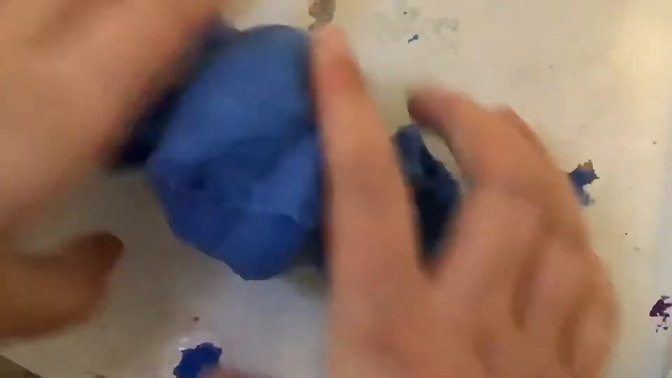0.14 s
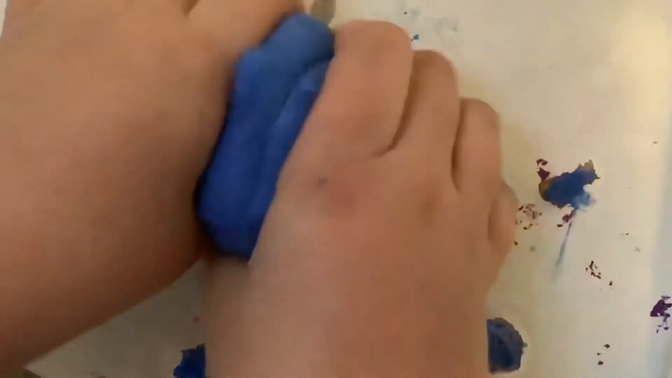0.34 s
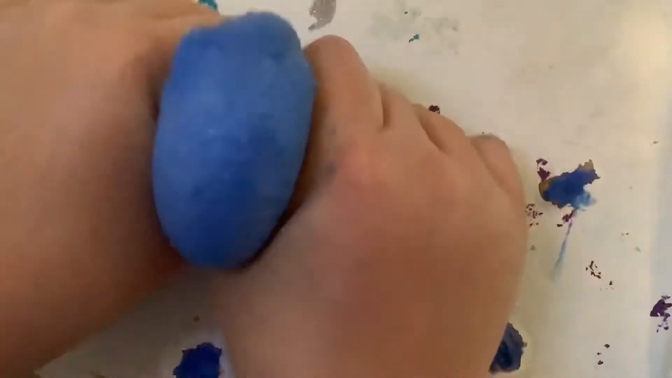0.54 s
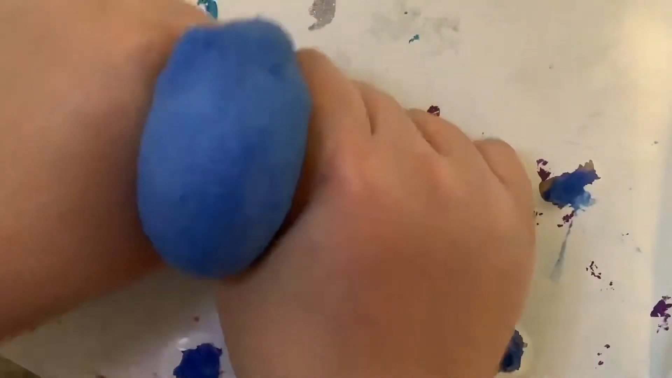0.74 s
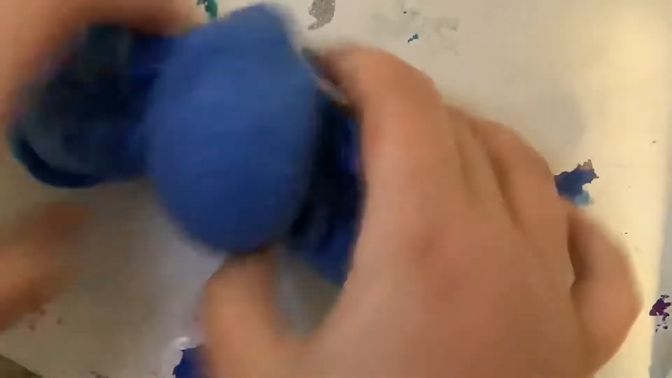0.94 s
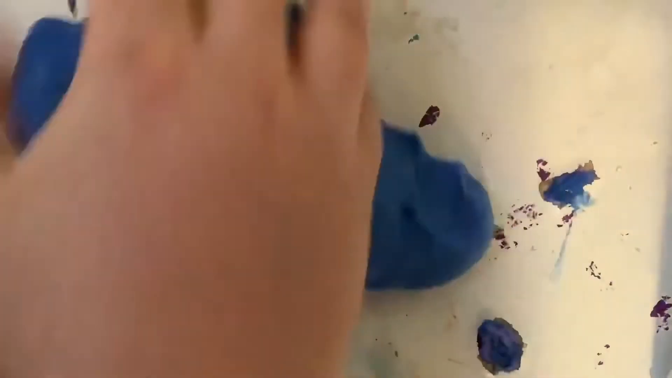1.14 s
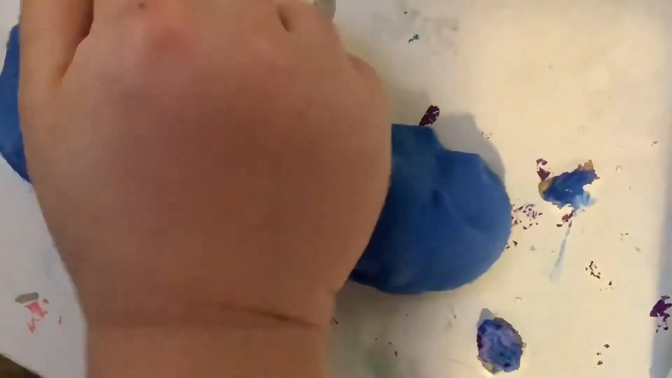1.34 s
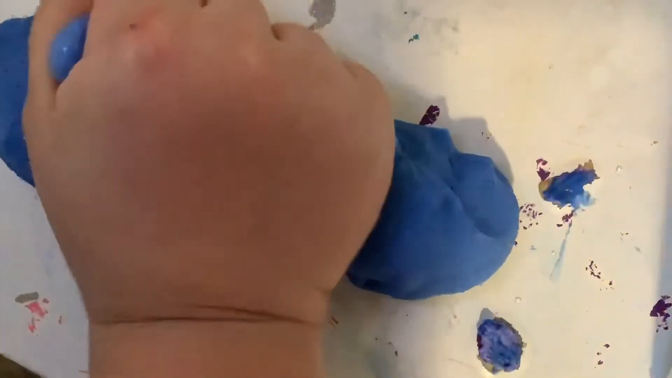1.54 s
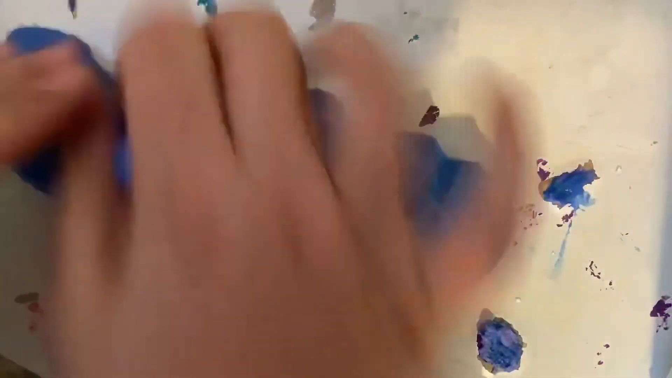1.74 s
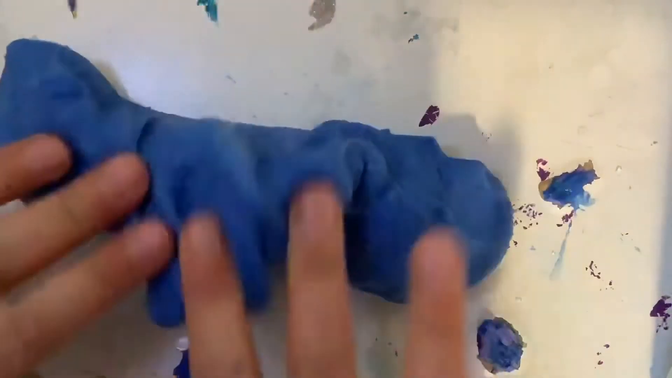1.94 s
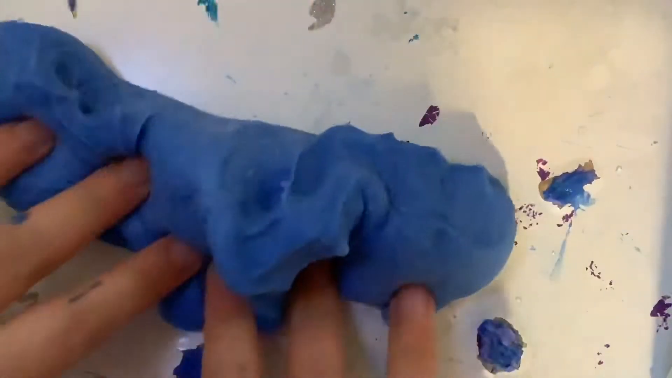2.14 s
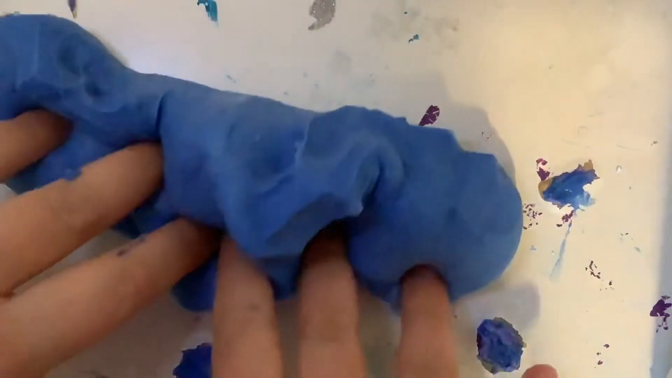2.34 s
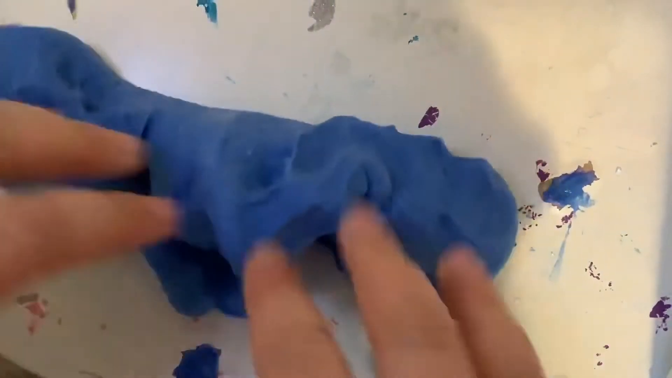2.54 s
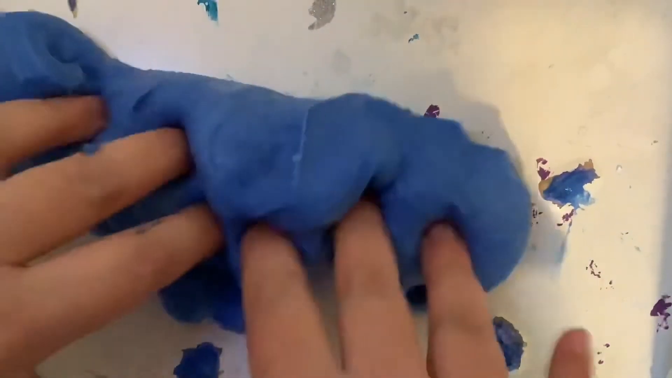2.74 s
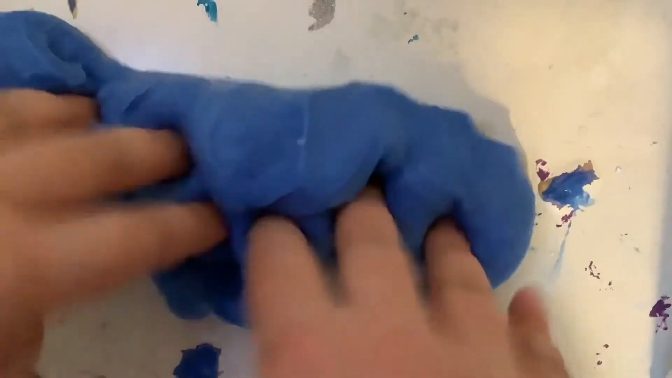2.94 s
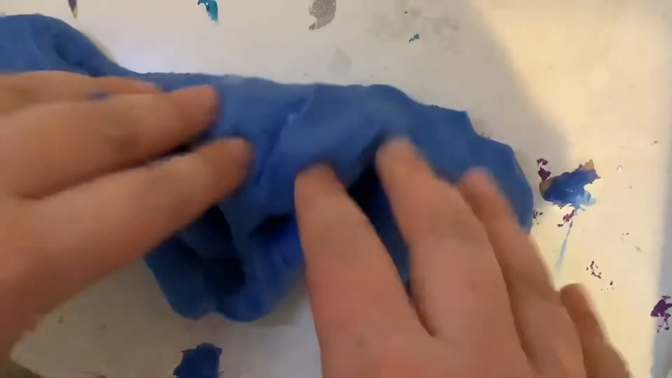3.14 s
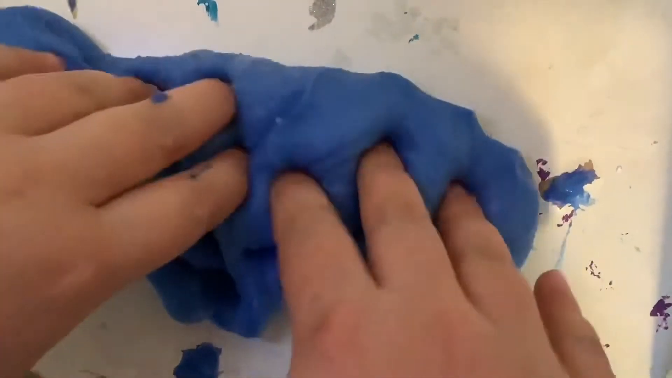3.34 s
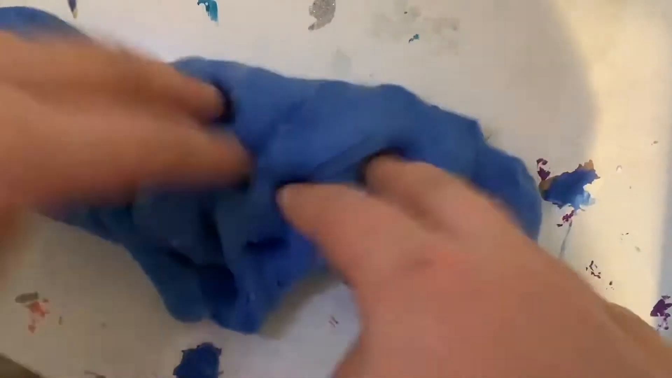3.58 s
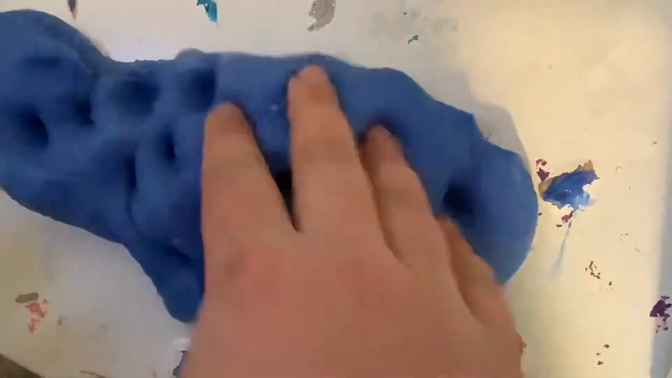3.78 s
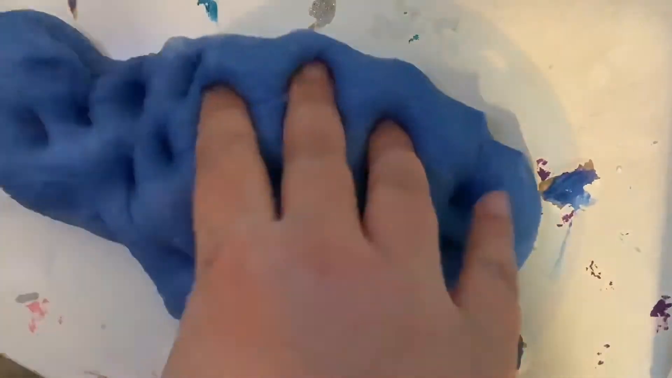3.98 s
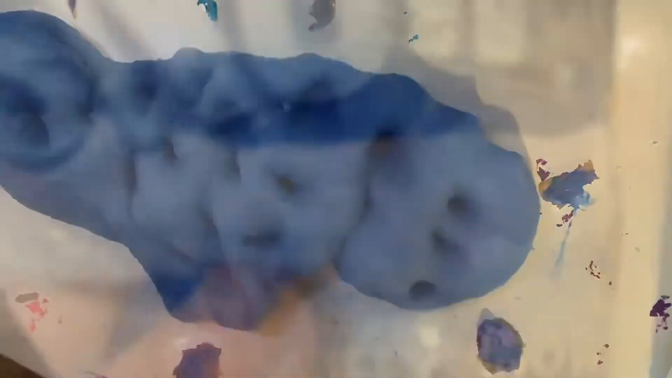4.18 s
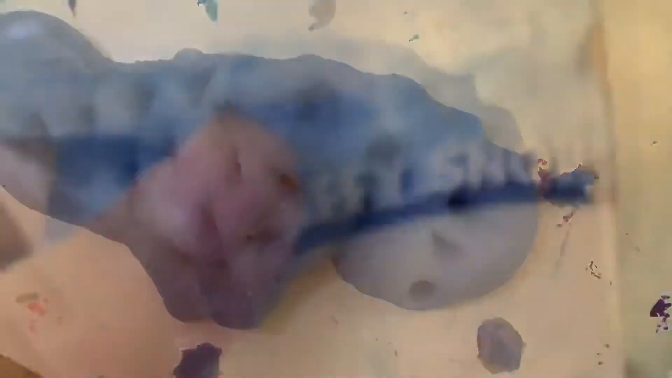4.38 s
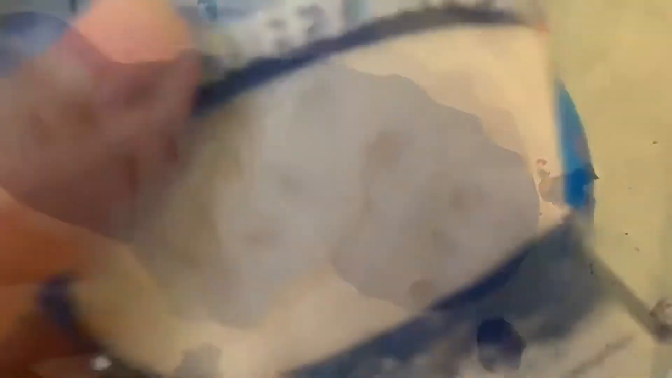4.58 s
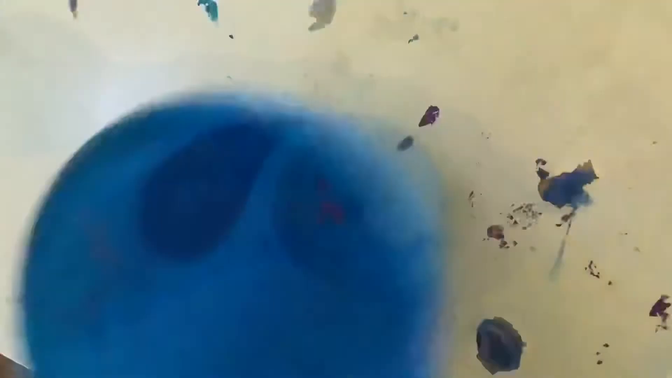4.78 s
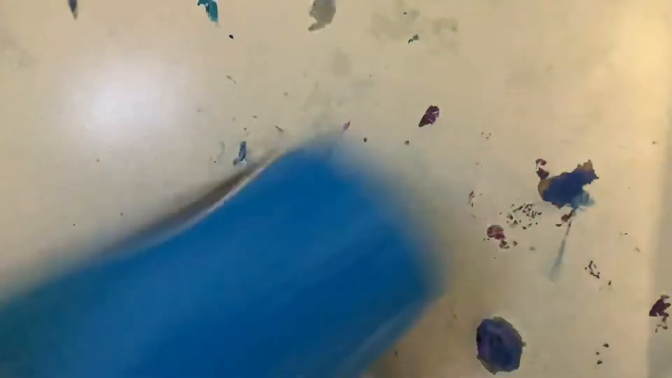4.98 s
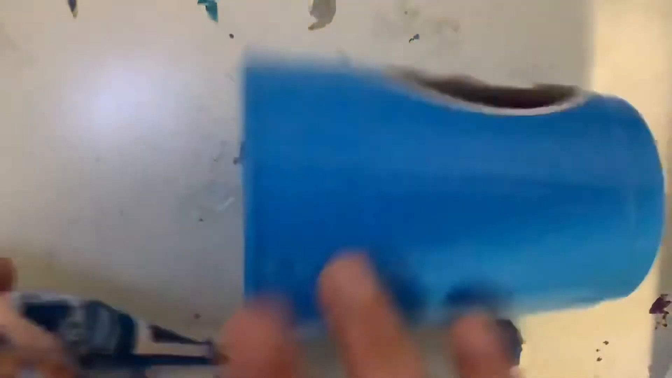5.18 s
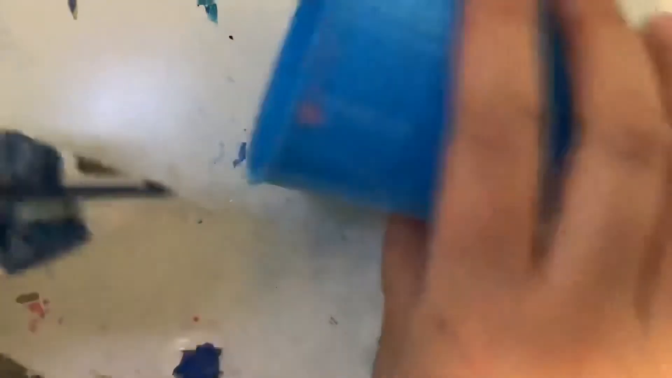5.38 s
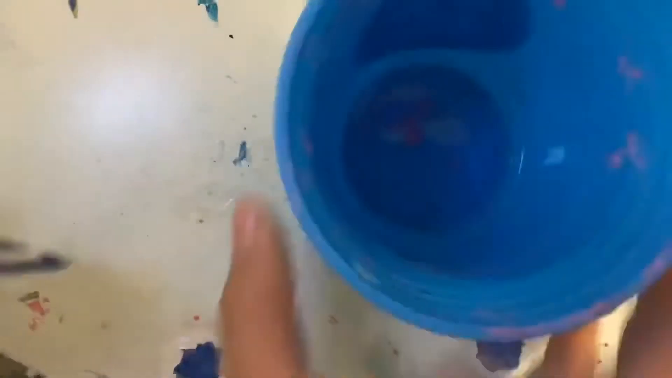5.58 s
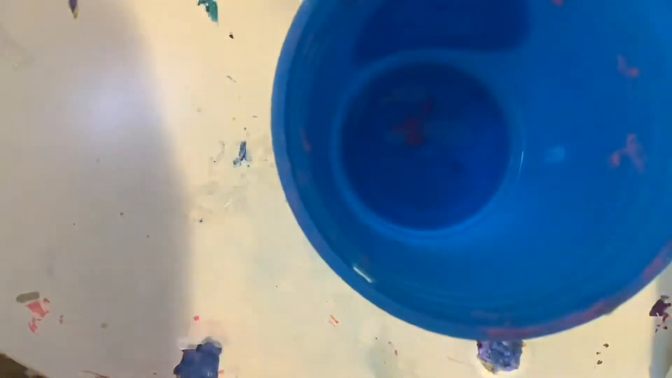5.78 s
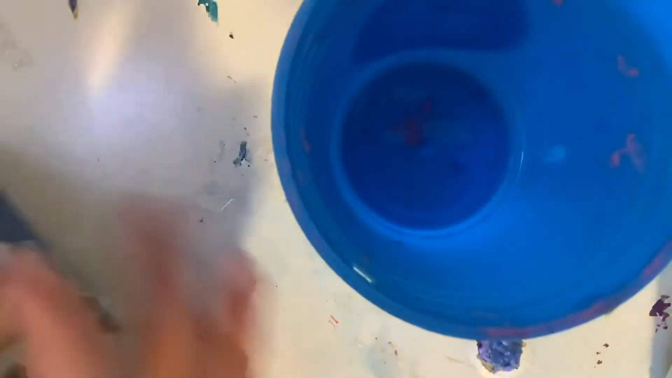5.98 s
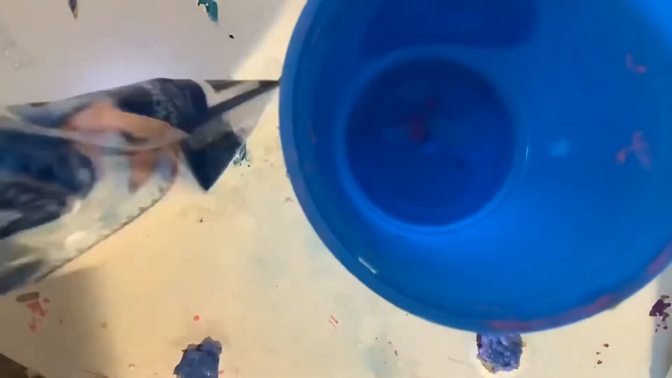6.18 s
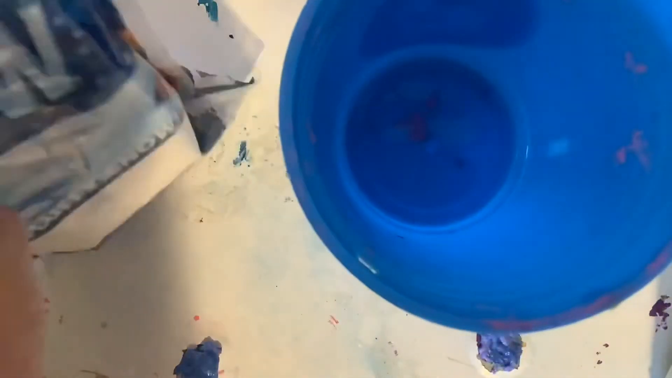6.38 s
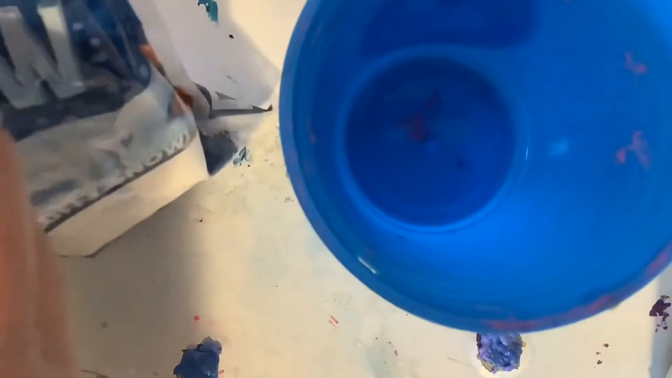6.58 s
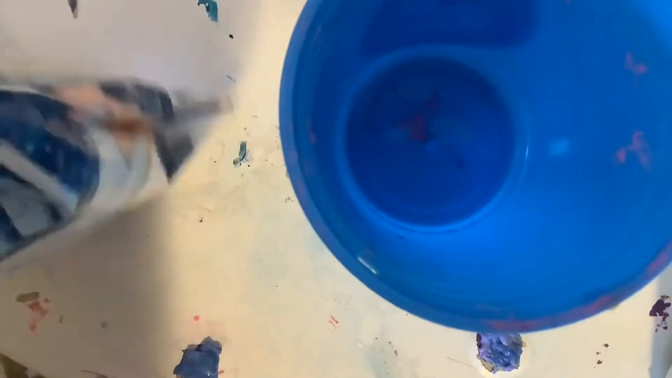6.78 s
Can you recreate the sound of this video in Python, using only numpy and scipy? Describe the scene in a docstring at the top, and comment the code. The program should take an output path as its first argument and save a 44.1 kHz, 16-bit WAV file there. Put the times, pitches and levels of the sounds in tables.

```python
"""Hands knead foamy slime on a hollow table top, then handle a crinkly bag and a plastic cup, all close up.
From the start: faint mains hum, room hiss, fizz of noise and clicks, noise-burst pops, modal thuds on the board.
Near 1.1 s a short wet squelch of band noise. Kneading, pops and thuds carry on until about 4.2 s.
From 4.2 s: bag snaps (noise bursts, each with a falling-pitch flap) and rustle; from 4.7 s modal cup knocks.
Cup scraping rises with the handling. Other hum lines fade in between 4.05 and 4.62 s; the hiss stays."""
import sys
import numpy as np
from scipy import signal
from scipy.fft import rfft, irfft, next_fast_len
from scipy.io import wavfile
from scipy.ndimage import uniform_filter1d

SR = 44100
rng = np.random.default_rng(int(sys.argv[2]) if len(sys.argv) > 2 else 0)


def inscribe(sig):
    """Save sig as 16-bit PCM at rate SR to the path in sys.argv[1].

    A 1-D sig is mono; a 2-D sig holds one channel per row.
    Samples are clipped to [-1, 1] before scaling.
    """
    pcm = np.round(np.clip(np.atleast_2d(sig).T, -1, 1) * 32767)
    wavfile.write(sys.argv[1], SR, pcm.astype(np.int16))


N = 300762
T = np.arange(N) / SR
FAST = next_fast_len(N)

# mains hum lines under each half: (frequency [Hz], level [dB rms])
HUM_BEFORE = [(120, -66), (240, -82)]
HUM_AFTER = [(240, -68), (481, -77.5)]
# share of the second hum: (time [s], share [0-1])
HUM_FADE = [(4.05, 0), (4.62, 0.96)]
# room hiss: (frequency [Hz], relative density [dB per Hz])
HISS = [(30, -53), (100, -4), (250, 4.5), (900, -2.5), (3000, -27), (16000, -34.5)]
# squeezes and pokes: (peak [s], hold [s], release [s per 20 dB], fizz [dB], load on the board [dB])
SQUEEZES = [(0.0, 0.014, 0.06, -60, -58), (0.185, 0.017, 0.01, -52.5, -57.5),
            (0.229, 0.0067, 0.12, -54.5, -54), (0.33, 0, -0.23, -62, -69), (0.395, 0.031, 0.14, -51, -57.5),
            (0.523, 0, -0.02, -45, -59), (0.582, 0.055, 1.1, -59, -80.5), (0.686, 0.071, -0.19, -52, -61.5),
            (0.743, 0.11, 0, -41, -46), (0.922, 0, 0.16, -57.5, -70), (0.984, 0.0069, -0.52, -61, -78),
            (1.077, 0.056, -0.06, -52, -70), (1.164, 0.045, 0.03, -57, -62),
            (1.345, 0.0016, 0.0841, -40.5, -64.5), (1.397, 0.024, 0, -59, -58),
            (1.575, 0.079, 0.0633, -45, -52), (1.86, 0.032, 1, -63, -78.5), (1.96, 0.065, 0.01, -61, -74.5),
            (2.181, 0.0049, 0.11, -54.5, -70.5), (2.374, 0.054, 0.0338, -42, -43.5),
            (2.658, 0.084, 0.02, -57, -76), (2.911, 0.024, 0.0263, -31.5, -35.5),
            (3.264, 0, 0.17, -59, -63), (3.494, 0.024, 0.0163, -34, -36.5),
            (3.744, 0.0065, 0.005, -55.5, -56), (4, 0.013, 0.06, -46.5, -48), (4.071, 0, 0.05, -51, -53),
            (4.183, 0.079, 0.37, -72, -72)]
# spectrum of bubbles: (frequency [Hz], relative density [dB per Hz])
FIZZ = [(900, -30.5), (1700, -6.5), (2300, -7), (3500, -6), (4800, -3), (7000, -3.5), (8600, 0),
        (10200, -7), (12300, -14), (16000, -16.5)]
# bubbles bursting in the slime: (time [s], peak [dB], centre [Hz], length [ms])
POPS = [(0.0524, -28, 5000, 1.37), (0.2743, -26.5, 4240, 0.7), (0.293, -38, 9000, 0.55),
        (0.369, -42, 8700, 0.73), (0.391, -27, 7750, 1.6), (0.4144, -13, 8700, 1.3), (0.425, -38, 9100, .6),
        (0.4436, -21.5, 10200, 0.38), (0.4732, -27, 8800, 0.55), (0.4778, -31.5, 7840, 1.5),
        (0.521, -36, 10700, .8), (0.534, -28.5, 10200, 1.3), (0.577, -21.5, 4940, 2.9),
        (0.5874, -31, 9550, 1.7), (0.942, -33, 7800, 3.6), (1.1698, -36.5, 5870, 4.1),
        (1.278, -44.5, 8460, 2.8), (1.303, -23.5, 6860, 0.98), (1.314, -9, 9000, 1.7),
        (1.32, -2.5, 6840, 1.3), (1.3215, -13.5, 4700, 2.4), (1.329, -24.5, 5500, 4.5),
        (1.395, -32, 7600, 0.88), (1.5847, -30, 9600, 0.76), (1.6356, -30, 6800, 0.81),
        (1.697, -34.5, 7400, 1.7), (1.852, -34.5, 9200, 1.9), (1.9555, -30, 7750, 3.2),
        (2.1724, -26, 11900, 0.63), (2.203, -35.5, 9350, 0.7), (2.276, -36, 8750, 0.57),
        (2.3595, -37, 7500, 5), (2.374, -22, 8100, 11), (2.397, -23.5, 5900, 3), (2.406, -24.5, 5940, 1.6),
        (2.4305, -6.5, 6800, 0.55), (2.4359, -15, 6760, 0.53), (2.8933, -25.5, 6070, 2.2),
        (2.911, -13.5, 7800, 0.18), (2.9337, -17.5, 8450, 3.1), (2.9402, -14, 7750, 1.7),
        (3.2477, -35, 11400, 0.63), (3.259, -31.5, 7200, 1.5), (3.335, -35, 9400, 1),
        (3.4914, -7.5, 8210, 0.83), (3.4928, -5, 7400, 0.84), (3.5026, -24, 7840, 1.4),
        (3.5152, -13, 8700, 0.64), (3.52, -16, 7930, 0.52), (3.53, -19, 7100, 1.2), (3.54, -22, 6370, 4.6),
        (3.737, -35.5, 3140, 1.8), (3.9852, -27, 9200, 1.25), (4.006, -32, 6200, 1.6),
        (4.011, -25, 2900, 8), (4.07, -32, 5400, 0.87)]
# fingers and slime landing on the board: (time [s], peak [dB], favoured pitch [Hz])
THUDS = [(0.1843, -42, 423), (0.2732, -35.5, 1620), (0.33, -43.5, 1520), (0.3893, -37, 1700),
         (0.524, -44, 515), (0.844, -31.5, 560), (1.1652, -44, 504), (1.279, -48, 1140),
         (1.319, -23.5, 610), (1.3999, -31.5, 1750), (1.956, -45, 760), (2.379, -31.5, 470),
         (2.3982, -20, 880), (2.402, -27.5, 440), (2.4313, -16, 1000), (2.4368, -19.5, 600),
         (2.4389, -20, 964), (2.8937, -33.5, 730), (2.913, -19, 1070), (2.931, -18, 910),
         (2.947, -12.5, 790), (3.2585, -39, 404), (3.3013, -31.5, 515), (3.4938, -24.5, 506),
         (3.503, -26.5, 530), (3.539, -21, 1000), (3.7362, -33.5, 887), (3.8905, -49.5, 990),
         (3.9907, -37, 624), (4.013, -20, 532), (4.0673, -23.5, 810)]
# modes of the table top: (frequency [Hz], level [dB], t60 [s])
BOARD = [(230, -1, 0.048), (327, -1, 0.066), (434.4, -1, 0.062), (531, -1, 0.037), (615, -3, 0.027),
         (806.2, -3, 0.045), (882.6, 3, 0.023), (1040, 1, 0.029), (1290, -2.5, 0.012)]
# soft, heavy bumps that flex the whole top, before the bass cut: (time [s], peak [dB], pitch [Hz])
BUMPS = [(0.136, -42.5, 134), (0.227, -45.5, 124), (1.315, -44, 294), (2.397, -42.5, 275),
         (2.939, -39.5, 212), (3.259, -43, 285), (3.3, -41, 254), (3.491, -41, 214), (3.538, -36, 117),
         (4.018, -35, 132), (4.065, -36.5, 143), (4.67, -46.5, 246), (4.862, -34.5, 193),
         (4.946, -27.5, 262), (5.118, -41, 216), (5.156, -41.5, 216), (5.242, -31, 225),
         (5.403, -41.5, 256), (6.021, -46, 295), (6.67, -34, 330)]
# slow shoves that rock the table: (peak [s], level [dB])
SHOVES = [(0.161, -49), (0.266, -64), (0.586, -57.5), (0.766, -61.5), (0.86, -50.5), (1.341, -55),
          (1.67, -64), (2.003, -64), (2.968, -53.5), (3.245, -73), (3.544, -61), (4.085, -48), (4.97, -56),
          (5.409, -66.5)]
# creases of the bag snapping: (time [s], peak [dB], centre [Hz], dull flap that follows [dB])
SNAPS = [(4.197, -20.5, 4570, -29.5), (4.225, -22, 7200, -32), (4.267, -32.5, 5760, -36),
         (4.301, -42, 4160, -34), (4.67, -27, 12500, -44), (4.676, -31.5, 12400, -43.5),
         (4.837, -20, 12200, -36), (4.879, -29, 4600, -37), (4.8959, -15.5, 8300, -18.5),
         (4.906, -17.5, 5600, -39), (4.9319, -18, 10800, -16.5), (4.9388, -5, 11400, -39),
         (5.018, -25, 9700, -70), (5.0234, -24.5, 8800, -53), (5.1379, -24.5, 7700, -29),
         (5.2475, -25.5, 8100, -28), (5.2531, -27, 3470, -26.5), (5.2993, -24.5, 10000, -41),
         (5.336, -12.5, 5730, -13.5), (5.4059, -7.5, 10900, -12), (5.414, -28, 6400, -38),
         (5.578, -35, 10700, -50.5), (5.5981, -46, 3100, -44), (5.621, -31, 5570, -37),
         (5.6277, -31.5, 4540, -37.5), (5.65, -28, 9000, -40), (5.661, -13.5, 11200, -32),
         (5.689, -27, 7960, -49), (5.711, -26.5, 12000, -58), (5.568, -57, 3700, -60.5),
         (5.792, -9, 8400, -25.5), (5.8009, -17, 11100, -28.5), (5.81, -12, 7840, -38),
         (5.8119, -22, 11530, -30), (5.8153, -10, 9500, -23.5), (5.8613, -15, 10000, -34.5),
         (5.8834, -16, 5300, -29), (5.8985, -27, 9600, -37), (5.943, -10, 8340, -42),
         (5.957, -11, 9600, -29.5), (5.961, -10.5, 6440, -50), (6.003, -13, 8350, -30),
         (6.0176, -6, 11400, -21), (6.0216, -6, 10300, -24), (6.0302, -19, 6000, -29),
         (6.0377, -10.5, 13000, -27), (6.042, -13, 12900, -44), (6.044, -9.5, 4530, -33),
         (6.0493, -6.5, 11800, -26), (6.06, -15.5, 9900, -47), (6.0822, -23.5, 9400, -34),
         (6.1232, -30.5, 5100, -33.5), (6.1359, -28, 4470, -33.5), (6.1562, -9, 10600, -41),
         (6.2205, -26.5, 12100, -37.5), (6.251, -30, 5070, -35.5), (6.27, -13.5, 6800, -28.5),
         (6.2871, -22, 12600, -33), (6.3055, -29, 12580, -39), (6.3312, -33, 11500, -46),
         (6.3384, -37, 3870, -36), (6.381, -25.5, 8000, -65), (6.427, -16, 10600, -33.5),
         (6.443, -38, 4530, -39), (6.467, -42, 11800, -41), (6.4798, -13, 9300, -31),
         (6.484, -10.5, 8900, -26), (6.505, -27, 6250, -39), (6.524, -26, 10500, -45),
         (6.5285, -22, 12000, -58), (6.532, -28, 3800, -33), (6.599, -28, 12900, -44),
         (6.6092, -11, 10500, -30), (6.617, -5.5, 12570, -22), (6.627, -20, 8900, -60),
         (6.647, -26, 13000, -32), (6.66, -17.5, 4300, -61), (6.672, -19, 10220, -29),
         (6.6841, -23.5, 9050, -59), (6.697, -44, 6000, -33), (6.712, -19, 3550, -38),
         (6.716, -33, 6100, -50), (6.728, -14.5, 12300, -36), (6.738, -16, 13910, -60),
         (6.7614, -22, 7160, -34), (6.7931, -22, 10800, -32.5), (6.8078, -23, 5570, -50),
         (6.8133, -29, 3500, -43)]
# grips and drags: (peak [s], hold [s], release [s per 20 dB], bag rustle [dB], cup scrape [dB])
GRIPS = [(4.349, 0, 0.16, -63.5, -90), (4.578, 0.1, 0.03, -65.5, -84), (4.685, 0.057, -0.22, -59.5, -57),
         (4.78, 0.07, 0.12, -60, -70), (4.923, 0.024, 0.16, -33.5, -37), (5.081, 0.043, -0.24, -41, -51),
         (5.259, 0.0088, 0.03, -52, -47), (5.349, 0.0093, -0.1236, -33.5, -40.5),
         (5.414, 0.0018, 0.1553, -51, -40.5), (5.578, 0.026, -0.5, -62.5, -79.5),
         (5.644, 0.018, -0.12, -42, -52), (5.679, 0.035, 0.03, -43.5, -53), (5.798, 0.048, 0, -46, -56),
         (5.876, 0.052, -0.1, -41, -52.5), (5.943, 0.037, -0.1, -40, -54), (6.029, 0, 0.09, -38, -38),
         (6.091, 0.00023, 0, -57, -47), (6.126, 0.047, -0.2, -53, -79.5), (6.245, 0.11, 0.18, -48.5, -58.5),
         (6.382, 0.0082, -0.57, -50, -65), (6.436, 0.0053, 0, -58, -54), (6.487, 0.062, 0, -56, -57),
         (6.566, 0, 0.5, -66, -70), (6.621, 0.015, 0.06, -37.5, -44.5), (6.703, 0.033, 0.05, -52, -51),
         (6.806, 0.0027, -0.33, -65, -35.5)]
# spectrum of the bag film: (frequency [Hz], relative density [dB per Hz])
RUSTLE = [(1500, -7.5), (2600, 2), (4500, 6), (6500, 0), (9500, 7), (12700, 5), (16000, 10.5)]
# cup striking the table: (time [s], peak [dB], favoured pitch [Hz])
KNOCKS = [(4.6703, -38, 1510), (4.7222, -39, 1435), (4.8383, -30.5, 1660), (4.872, -37, 760),
          (4.895, -14, 1640), (4.898, -12.5, 1000), (4.906, -16, 2487), (4.9095, -13.5, 1613),
          (4.9147, -14, 1030), (4.921, -17.5, 984), (4.929, -12.5, 996), (4.9381, -12, 1585),
          (4.9435, -13.5, 851), (4.986, -24, 1072), (5.0171, -25, 1375), (5.027, -36, 1530),
          (5.0997, -32, 890), (5.1258, -32.5, 1570), (5.1383, -31, 1005), (5.1483, -31, 780),
          (5.218, -38.5, 780), (5.239, -27.5, 1580), (5.2463, -38, 916), (5.2987, -28.5, 1300),
          (5.3348, -6, 2420), (5.3415, -15, 1014), (5.4, -27, 1750), (5.406, -1.5, 1748),
          (5.4232, -26.5, 746), (5.4421, -35, 1740), (5.5323, -32, 1123), (6.0977, -29.5, 1480)]
# modes of the cup: (frequency [Hz], level [dB], t60 [s])
CUP = [(243, -13.5, 0.07), (439, -1.5, 0.14), (669, -1, 0.067), (825, 0, 0.072), (1056, 2, 0.016),
       (1183, -5.5, 0.072), (1537, -4, 0.051), (1699, 7.5, 0.022), (1792, -11.5, 0.077), (2020, -20, 0.11),
       (2303, 6, 0.01), (2684, -1, 0.023), (3110, 8.5, 0.011)]
# spectrum of the dragged cup: (frequency [Hz], relative density [dB per Hz])
SCRAPE = [(70, -34), (140, -1), (300, 7.5), (450, 6), (850, 0), (1650, 0.5), (2400, -8), (4500, -61)]
# room decay, early part and faint long tail: (frequency [Hz], t60 [s])
ROOM = [(100, 0.16), (500, 0.017), (1400, 0.081), (4000, 0.012), (10000, 0.057)]
LATE = [(100, .5), (350, 0.32), (900, 0.28), (1800, 0.48), (2600, .35), (4000, 0.22), (10000, 0.43)]

HISS_DB, LATE_DB, EDGE_HZ = -77.5, -13.5, 16100

# gestures: attack as a share of the release
FIZZ_ATTACK, LOAD_ATTACK, RUSTLE_ATTACK, SCRAPE_ATTACK = 0.61, 0.6, 0.44, 0.45
# extra ringing of board and cup [s per 20 dB]
LOAD_LINGER_S, SCRAPE_LINGER_S = 0.068, 0.0067
# slow afterglow: (level against the peak [dB], fall [s per 20 dB])
FIZZ_TAIL, RUSTLE_TAIL = (-22, .16), (-28, .1)
SHOVE_RISE_S, SHOVE_FALL_S = 0.058, 0.029  # per 20 dB
SLIME_GONE_S, BAG_HELD_S = 4.27, 4.57
RESTING_FIZZ_DB, RESTING_LOAD_DB, RESTING_ROCK_DB = -70, -85.5, -75
RESTING_RUSTLE_DB, RESTING_SCRAPE_DB = -66.5, -75.5

# bursts: attack constant as a share of length; rate and fade per 20 dB of after-bursts; uneven colour
POP_RISE, SNAP_RISE = 0.2, 0.57
CRUMBS_PER_S, CRUMBLE_S, MOTTLE_DB = 700, .012, 3
SNAP_MS, SNAP_SKIRT_DB = .6, -7  # skirt: broad part against the hump

# strays: highest level over the gesture, middle pitch
STRAY_POP_DB, STRAY_POP_HZ, STRAY_POP_MS = 5.9, 12000, 0.6
STRAY_SNAP_DB, STRAY_SNAP_HZ = 8.5, 6000
STRAY_FLAP_DB = -12  # against its snap

LIGHT_DB, HARD_DB = -82, -55  # load of a light touch and of a hard squeeze
SMALL_HZ = 6250  # larger bubbles sound below this
SQUELCH_START_S, SQUELCH_END_S, SQUELCH_HZ, SQUELCH_DB = 1.072, 1.128, 890, -52.5

# struck bodies: pitch spread [share], wavering of the ring, mode spread with the spot struck
DETUNE, FLUTTER_DB, SPOT_DB = .012, 4.5, 2.2


def gain_of(db):
    """Decibels to amplitude."""
    return 10 ** (np.asarray(db) / 20)


def evened(x):
    """Scales to rms 1."""
    return x / np.sqrt(np.mean(x ** 2) + 1e-20)


def read(points, hz):
    """Reads a table on a log-frequency axis."""
    f, value = np.transpose(points)
    return np.interp(np.log(hz + 1), np.log(f + 1), value)


def highpassed(x, order, hz):
    """Butterworth bass cut."""
    return signal.sosfilt(signal.butter(order, hz, "high", fs=SR, output="sos"), x)


def coloured(x, points):
    """Multiplies the spectrum of x by the table, rms 1."""
    gain = gain_of(read(points, np.fft.rfftfreq(FAST, 1 / SR)))
    return evened(irfft(rfft(x, FAST) * gain, FAST)[:N])


def clumps(ms):
    """Slow random curve of rms 1 that changes over the given time."""
    span = max(int(ms * SR / 1000), 2)
    return evened(uniform_filter1d(uniform_filter1d(rng.standard_normal(N), span), span))


def place(times, peak_db, sounds, lead=0):
    """Mixes rows of sounds at their times, each scaled by the top of its smoothed envelope."""
    mix = np.zeros(N + sounds.shape[1])
    tops = uniform_filter1d(abs(signal.hilbert(sounds)), size=16).max(axis=1)
    for s, db, sound, top in zip(times, peak_db, sounds, tops):
        at = max(round(s * SR) - lead, 0)
        mix[at:at + len(sound)] += gain_of(db) * sound / top
    return mix[:N]


def swells(peak_s, hold_s, rise_s, fall_s, peak_db, tail=(-90, 1)):
    """Summed gain of gestures that rise, hold and fall, timed per 20 dB (at least 5 ms), then trail off."""
    age = T[::64] - peak_s[:, None]
    rise, fall = (np.maximum(v * np.ones(len(peak_s)), .005)[:, None] for v in (rise_s, fall_s))
    after = np.maximum((age - np.reshape(hold_s, (-1, 1))) / fall, 0)
    tail_db, tail_s = tail
    release = gain_of(-20 * after) + gain_of(tail_db - 20 * after * fall / max(tail_s, .01))
    attack = gain_of(peak_db[:, None] - 20 * np.maximum(-age / rise, 0))
    return np.interp(T, T[::64], (attack * release).sum(axis=0))


def strays(effort, start_s, end_s, over_db, hz, octaves, count):
    """Events at random moments, 0-12 dB under a ceiling that follows the gesture: (s, dB, Hz)."""
    when, size, tone = rng.random((count, 3)).T
    s = start_s + when * (end_s - start_s)
    db = 20 * np.log10(np.interp(s, T, effort)) + over_db - 12 * size
    return s, db, hz * 2 ** (octaves * (tone - .5))


def crackle(points, bands_hz, per_s, spread_db, bed, clump_db, own_db, clump_ms):
    """Uneven clicks over a noise bed; bands of grain size clump partly together, partly apart."""
    hz = np.fft.rfftfreq(FAST, 1 / SR)
    shared = clumps(clump_ms)
    total = 0
    for band in np.eye(len(bands_hz)):
        sizes = gain_of(spread_db * np.minimum(rng.exponential(1, N), 4))
        clicks = sizes * (rng.random(N) < per_s / SR)
        grains = clicks * rng.choice([-1., 1.], N) + bed * rng.standard_normal(N)
        share = np.clip(read(list(zip(bands_hz, band)), hz), 0, 1)
        level = gain_of(clump_db * shared + own_db * clumps(clump_ms))
        total = total + np.sqrt(share) * rfft(grains * level, FAST)
    return coloured(irfft(total, FAST), points)


def patchy(x, depth_db, bins, frames):
    """Lifts and lowers smooth random patches of time and frequency, rms 1."""
    z = signal.stft(x, nperseg=256, noverlap=192)[2]
    field = rng.standard_normal(z.shape)
    for _ in range(2):
        field = uniform_filter1d(uniform_filter1d(field, bins, axis=0), frames, axis=1)
    z = z * gain_of(depth_db * evened(field))
    return evened(signal.istft(z, nperseg=256, noverlap=192)[1][:N])


def bursts(hz, ms, octaves, skirt, skirt_db, rise, slope, crumble_db):
    """Short puffs of noise, each with a hump at its own pitch over the broad spectrum of the material."""
    age = (np.arange(1024) - 200) / SR * 1000 / ms[:, None]
    shape = np.where(age < 0, np.exp(age / rise), np.exp(-1.6 * age))
    # smaller bursts follow for a few milliseconds as the neighbourhood gives way
    luck, size = rng.random((2, len(hz), 500))
    crumble = gain_of(crumble_db - 20 * np.arange(500) / SR / CRUMBLE_S)
    train = (luck < CRUMBS_PER_S / SR) * size * crumble
    train[:, 0] = 1
    shape = signal.fftconvolve(shape, train, axes=1)[:, :1024]
    f = np.fft.rfftfreq(1024, 1 / SR) + 1
    hump = np.exp(-.5 * (np.log2(f / hz[:, None]) / octaves) ** 2)
    broad = gain_of(skirt_db + read(skirt, f)) * np.minimum(f / hz[:, None], 1) ** slope
    spectrum = hump + broad
    mottle = evened(uniform_filter1d(rng.standard_normal(spectrum.shape), size=30, axis=1))
    noise = rng.standard_normal((len(hz), 1024))
    return irfft(rfft(shape * noise) * spectrum * gain_of(MOTTLE_DB * mottle))


def decaying(hz, cycles, attack, size=8192):
    """Rows of sines that swell within part of a cycle and die 60 dB in the given number of cycles."""
    turns = hz[:, None] * np.arange(size) / SR
    return gain_of(-60 * turns / cycles) * np.sin(2 * np.pi * turns) * (1 - np.exp(-turns / attack))


def rings(modes, hz, octaves, scatter_db, contact_ms, slap_db, give):
    """One blow a row: a short slap at the favoured pitch plus modes, weighted towards that pitch."""
    f, db, t60 = (c[:, None] for c in np.transpose(modes))
    mode_rings = gain_of(db) * decaying(f[:, 0], f * t60, 0.69)
    luck = rng.standard_normal((len(hz), len(modes)))
    nearness = 1 / (1 + (np.log2(f.T / hz[:, None]) / octaves) ** 2) ** 1.1
    signs = (-1) ** np.arange(len(modes))
    ring = (gain_of(scatter_db * luck) * nearness * signs) @ mode_rings
    # give bends the nearest mode towards the favoured pitch: strongly for the cup, not for the board
    n = np.arange(ring.shape[1])
    nearest = f[abs(np.log(f.T / hz[:, None])).argmin(axis=1), 0]
    bend = (hz / nearest) ** give * (1 + DETUNE * rng.standard_normal(len(hz)))
    ring = np.array([np.interp(n * b, n, row) for b, row in zip(bend, ring)])
    # loose contact makes the ring flutter
    flutter = evened(uniform_filter1d(rng.standard_normal(ring.shape), size=130, axis=1))
    slap = gain_of(slap_db) * decaying(hz, 9.2, 0.37)
    blow = ring * gain_of(FLUTTER_DB * flutter) + slap
    # the contact chatters for a moment after the first touch
    fade = np.exp(-np.arange(900) / SR * 1000 / contact_ms)
    chatter = 0.035 * rng.standard_normal((len(hz), 900)) * fade
    chatter[:, 0] = 1
    return signal.fftconvolve(blow, chatter, axes=1)


def hum_of(lines):
    """Sum of steady mains sines at random phase."""
    return sum(gain_of(db) * np.sqrt(2) * np.sin(2 * np.pi * (hz * T + rng.random())) for hz, db in lines)


def background():
    """Mains hum wavers and passes from one set of lines to the other; hiss is steady shaped noise."""
    share = np.clip(np.interp(T, *np.transpose(HUM_FADE)), 0, 1)
    hum = (1 - share) * hum_of(HUM_BEFORE) + share ** 3 * hum_of(HUM_AFTER)
    hum = hum * gain_of(2.2 * clumps(40))
    return hum + gain_of(HISS_DB) * coloured(rng.standard_normal(N), HISS)


def squeezing():
    """How hard the slime fizzes and how hard it loads the board."""
    s, hold, fall, fizz_db, load_db = np.transpose(SQUEEZES)
    there = np.clip((SLIME_GONE_S - T) / .05, 0, 1)
    effort = swells(s, hold, FIZZ_ATTACK * fall, fall, fizz_db, FIZZ_TAIL)
    load = swells(s, hold, LOAD_ATTACK * fall, fall + LOAD_LINGER_S, load_db)
    return effort + there * gain_of(RESTING_FIZZ_DB), load + there * gain_of(RESTING_LOAD_DB)


def squelch():
    """Wet air squeezed from a fold: a brief narrow band of noise."""
    hz = SQUELCH_HZ
    band = [(hz / 1.3, -30), (hz, 0), (hz * 1.35, -30), (4000, -90)]
    wet = coloured(rng.standard_normal(N), band)
    gate = np.clip(np.minimum(T - SQUELCH_START_S, SQUELCH_END_S - T) / 0.0089, 0, 1)
    return gain_of(SQUELCH_DB) * wet * gate


def slime():
    """Single bubbles pop over a dense fizz of tiny ones that follows the squeeze."""
    effort, load = squeezing()
    small = strays(effort, 0, SLIME_GONE_S, STRAY_POP_DB, STRAY_POP_HZ, 1.2, count=25)
    s, db, hz, ms = np.hstack([np.transpose(POPS), [*small, np.full(25, STRAY_POP_MS)]])
    pops = place(s, db, bursts(hz, ms, 0.27, FIZZ, -3, POP_RISE, .25, -9.5), lead=200)
    fizz = crackle(FIZZ, (2000, 4500, 8000, 13000), 4000, 3.4, 1.2, 1.5, 2.2, 5.)
    fizz = patchy(fizz, 2., bins=3, frames=14)
    # a light touch bursts only the smallest, highest bubbles; a hard squeeze adds larger ones
    large = signal.sosfiltfilt(signal.butter(2, SMALL_HZ, fs=SR, output="sos"), fizz)
    lightness = np.clip((HARD_DB - 20 * np.log10(load)) / (HARD_DB - LIGHT_DB), 0, .9)
    return pops + effort * (fizz - large * lightness) + squelch()


def rocking():
    """How far the table rocks."""
    s, db = np.transpose(SHOVES)
    there = np.clip((SLIME_GONE_S - T) / 0.15, 0, 1)
    return swells(s, 0, SHOVE_RISE_S, SHOVE_FALL_S, db) + there * gain_of(RESTING_ROCK_DB)


def board():
    """The table top rings under thuds, mutters under the kneading, flexes and rocks when shoved."""
    s, db, hz = np.transpose(THUDS)
    thuds = place(s, db, rings(BOARD, hz, 1.0, SPOT_DB, 2.1, 11.0, 0))
    kneading = crackle([(100, 0), (3000, 0)], (300, 900), 900, 3.5, .5, 1.5, 2.5, 8.)
    ring = rings(BOARD, np.array([750.]), 4.5, 0, 1.0, -34, 0)[0]
    mutter = evened(signal.oaconvolve(kneading, ring)[:N])
    s, db, hz = np.transpose(BUMPS)
    bumps = place(s, db, decaying(hz, 8.4, 0.87))
    rumble = [(20, -28.0), (50, -28.0), (70, -18), (100, -18.5), (160, -20.5), (400, -80.5)]
    rock = coloured(rng.standard_normal(N), rumble)
    _, load = squeezing()
    return highpassed(thuds + load * mutter + bumps, 2, 90) + rocking() * rock


def handling():
    """How hard the bag rustles and the cup scrapes."""
    s, hold, fall, rustle_db, scrape_db = np.transpose(GRIPS)
    held = np.clip((T - BAG_HELD_S) / 0.049, 0, 1)
    grip = swells(s, hold, RUSTLE_ATTACK * fall, fall, rustle_db, RUSTLE_TAIL)
    drag = swells(s, hold, SCRAPE_ATTACK * fall, fall + SCRAPE_LINGER_S, scrape_db)
    return grip + held * gain_of(RESTING_RUSTLE_DB), drag + held * gain_of(RESTING_SCRAPE_DB)


def flaps(s, db):
    """Dull flaps of the film: rattling sines that fall in pitch as the bend spreads."""
    t = np.arange(700) / SR
    drop_hz = 2000 * gain_of(4.56 * rng.standard_normal((len(s), 1)))
    final_hz = rng.uniform(316, 564, (len(s), 1))
    turns = np.cumsum(final_hz + drop_hz * np.exp(-t / 0.001305), axis=1) / SR
    rattle = 0.4 * evened(uniform_filter1d(rng.standard_normal(turns.shape), 14, axis=1))
    return place(s, db, (np.sin(2 * np.pi * turns) + rattle) * t * np.exp(-t / 0.0016))


def bag():
    """Creases give way in bright snaps, each with a dull flap of the film, over rustle."""
    grip, _ = handling()
    small = strays(grip, BAG_HELD_S, T[-1], STRAY_SNAP_DB, STRAY_SNAP_HZ, 2.2, count=130)
    s, db, hz, flap_db = np.hstack([np.transpose(SNAPS), [*small, small[1] + STRAY_FLAP_DB]])
    puffs = bursts(hz, np.full(len(s), SNAP_MS), 0.91, RUSTLE, SNAP_SKIRT_DB, SNAP_RISE, 0, -7.5)
    snaps = place(s, db, puffs, lead=200)
    rustle = crackle(RUSTLE, (3000, 5500, 9000, 14000), 2000, 4.2, .7, 1.8, 3.2, 3.)
    rustle = patchy(rustle, 2.5, bins=3, frames=14)
    return snaps + flaps(s, flap_db) + grip * rustle


def cup():
    """Hollow plastic rings when knocked and grates in grains when dragged."""
    s, db, hz = np.transpose(KNOCKS)
    knocks = place(s, db, rings(CUP, hz, 0.52, SPOT_DB, 3.4, 8.1, 0.94))
    scrape = crackle(SCRAPE, (200, 600, 1600), 300, 4.5, .35, 2.5, 2.5, 6.)
    _, drag = handling()
    return knocks + drag * scrape


def room(x):
    """Sparse random-sign echoes, each band dying at its own speed."""
    taps = np.zeros((3, SR // 2))
    at = np.arange(60, taps.shape[1] - 12, 12)
    jitter = rng.integers(0, 12, (3, len(at)))
    np.put_along_axis(taps, at + jitter, rng.choice([-1., 1.], (3, len(at))), axis=1)
    hz, t, z = signal.stft(taps, SR, nperseg=128)
    early_db, late_db = (-60 * t / np.maximum(read(table, hz), .01)[:, None] for table in (ROOM, LATE))
    decay = gain_of(early_db) + gain_of(LATE_DB + late_db)
    tails = signal.istft(z * decay, SR, nperseg=128)[1]
    tails = tails / np.linalg.norm(tails[0])
    # three sets take turns at 6 Hz, which keeps the tail from ringing on fixed pitches
    turns = np.sqrt(2 / 3) * np.cos(2 * np.pi * (6 * T + np.arange(3)[:, None] / 3))
    return signal.oaconvolve(x * turns, tails, axes=1).sum(axis=0)[:N]


def scene():
    """All sources close to the microphone, with a little room."""
    heavy = slime() + board()
    # cup and bag are light and radiate no deep bass
    light = highpassed(bag() + cup(), 4, 150)
    wet = room(gain_of(-12.5) * heavy + gain_of(-18.5) * light)
    return (heavy + light + wet + background())[None]


def record(dry):
    """The small microphone drops the deepest bass and rounds off the highest peaks; then the band limit."""
    thin = highpassed(dry, 3, 42)
    rounded = thin / (1 + (abs(thin) / .95) ** 4) ** .25
    lowpass = signal.firwin(255, EDGE_HZ, window=("kaiser", 9), fs=SR)
    return signal.oaconvolve(rounded, lowpass[None], "same")


dry = scene()
out = record(dry)
inscribe(out)
```